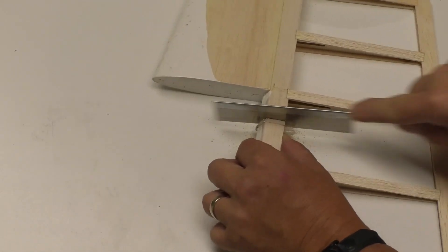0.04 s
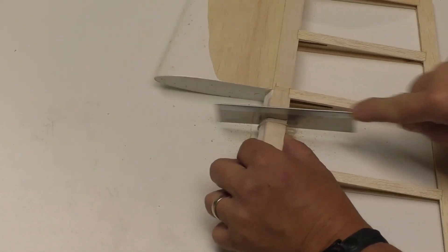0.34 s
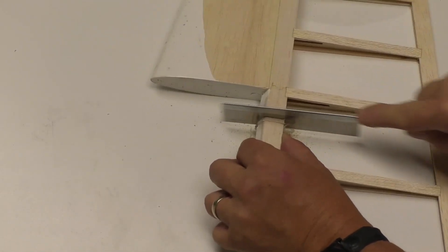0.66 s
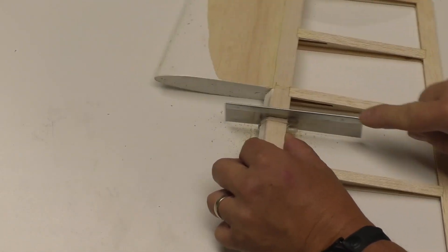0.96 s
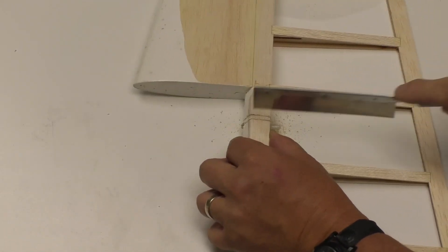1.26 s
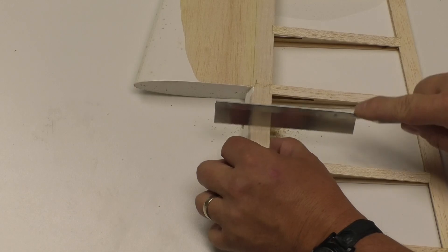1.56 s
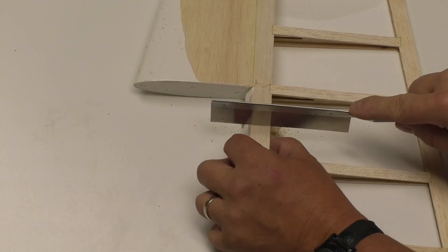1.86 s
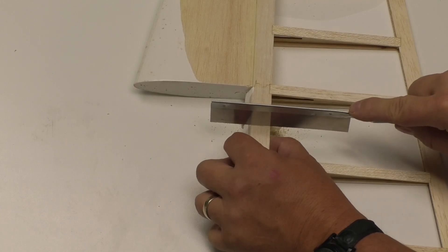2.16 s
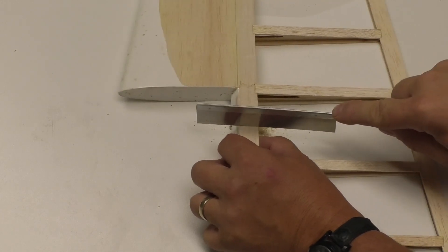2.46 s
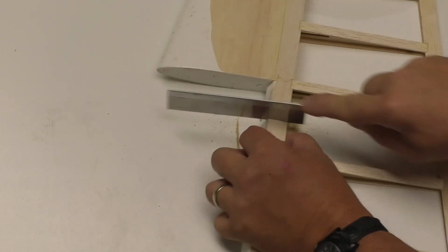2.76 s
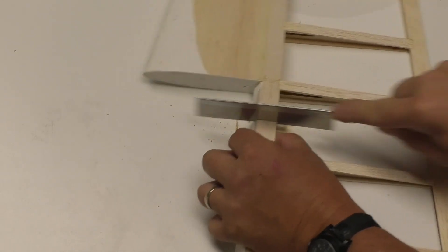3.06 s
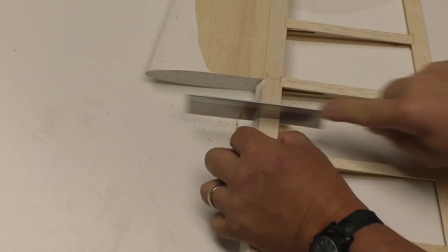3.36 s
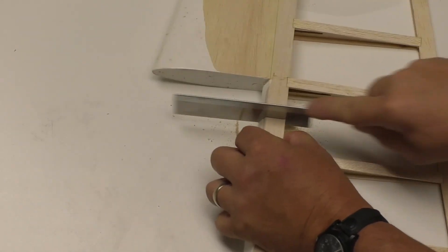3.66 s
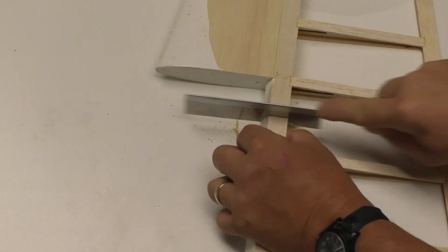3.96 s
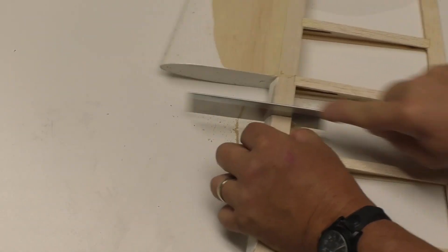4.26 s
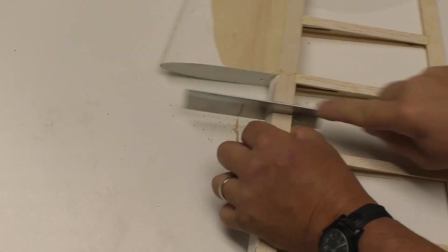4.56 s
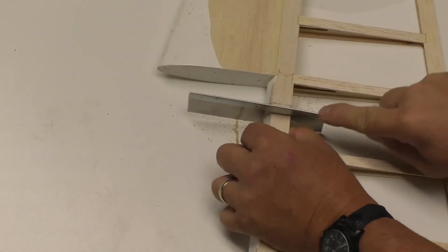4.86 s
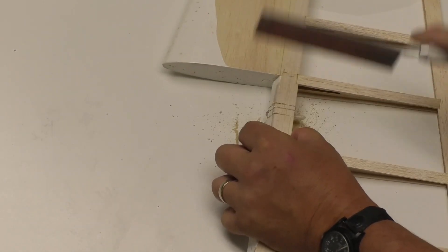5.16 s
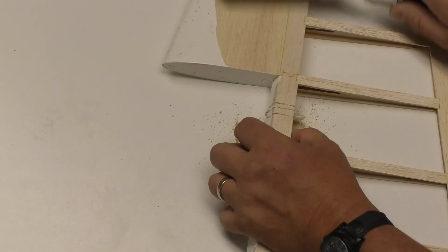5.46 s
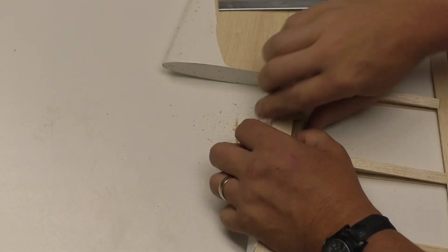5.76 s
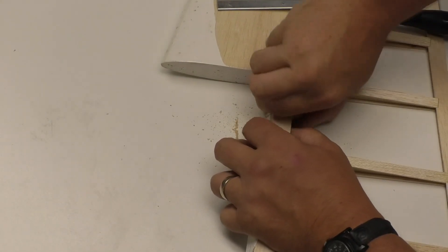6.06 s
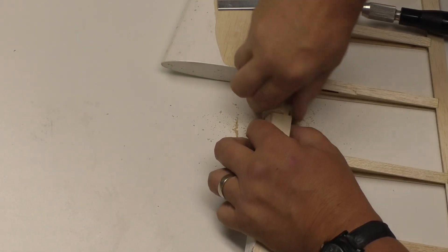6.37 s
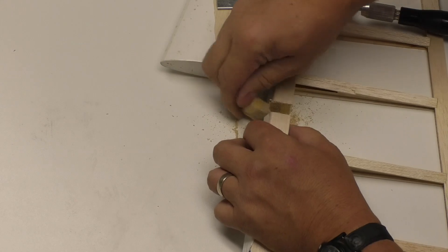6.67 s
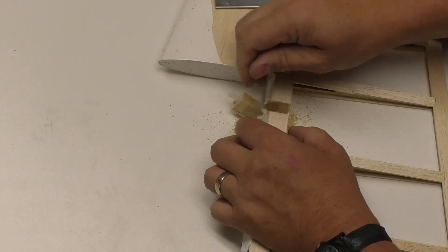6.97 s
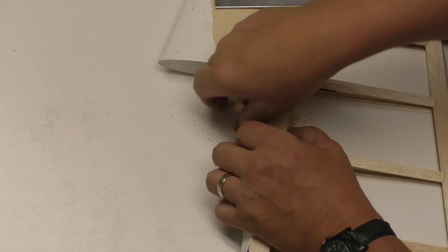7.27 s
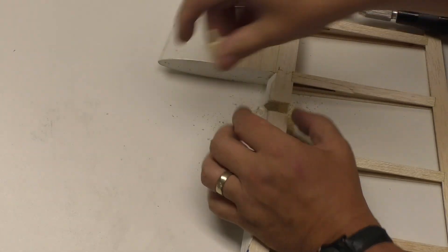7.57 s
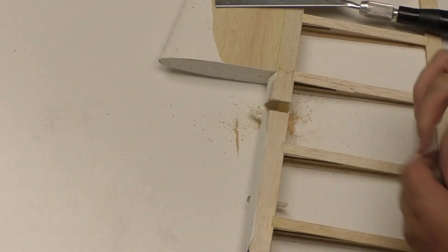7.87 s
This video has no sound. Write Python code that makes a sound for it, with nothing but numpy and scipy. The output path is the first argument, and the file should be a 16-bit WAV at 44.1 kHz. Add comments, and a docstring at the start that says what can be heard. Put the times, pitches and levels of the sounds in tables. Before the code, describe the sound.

In a small, slightly echoing workshop, a hand saw works rapidly back and forth through light wood, its fine teeth buzzing and hissing close by. After a short lull with soft knocks, a longer, brighter run of strokes follows. A loud clack marks the saw being set down. Then come a small crack, scattered ticks and soft finger scuffs as the piece is broken free, over quiet room air.

```python
"""A fine-toothed hand saw cuts a balsa spar of a model wing on a workbench, in a small, live room.
First run of quick strokes: teeth buzz at a rate set by blade speed, fibres rasp, the kerf hisses.
Pause: light knocks, a faint squeak. From 2.7 s a second run, crisp on the fresh edge until the blade
sinks in. At 5.5 s the saw is put down with a sharp clack; fingers then snap out the cut block
and pick at splinters. Room air and a faint hum throughout."""
import sys
import numpy as np
from scipy import signal
from scipy.fft import rfft, irfft
from scipy.io import wavfile
from scipy.ndimage import uniform_filter1d

SR = 44100
rng = np.random.default_rng(int(sys.argv[2]) if len(sys.argv) > 2 else 0)


def materialize(psi):
    """Save the field psi as 16-bit PCM at rate SR to the path in sys.argv[1].

    A 1-D psi becomes a single channel; in a 2-D psi each row is a channel.
    """
    bounded = np.clip(np.atleast_2d(psi).T, -1, 1)
    quanta = np.round(bounded * 32767).astype(np.int16)
    wavfile.write(sys.argv[1], SR, quanta)


N = 353593

# cutting and return strokes: (start [s], length [s], top tooth rate [Hz], bite [dB], rasp [dB])
PUSH_STROKES = [(-0.065, 0.128, 400.0, -31, -46.5), (0.209, 0.078, 710.0, -21.5, -28),
                (0.477, 0.146, 750.0, -27.0, -34), (0.793, 0.11, 560.0, -27.5, -34),
                (1.025, 0.115, 350.0, -49.5, -51.5), (2.369, 0.186, 600.0, -51, -50.5),
                (2.746, 0.097, 1000.0, -28, -26.5), (3.062, 0.126, 800.0, -27.5, -29.5),
                (3.361, 0.059, 840.0, -19, -26), (3.648, 0.09, 880.0, -22.5, -26),
                (3.958, 0.071, 930.0, -19.0, -26), (4.259, 0.108, 900.0, -23.5, -29.5),
                (4.555, 0.101, 830.0, -22.5, -29), (4.841, 0.087, 480.0, -25, -35),
                (5.06, 0.13, 750.0, -60.0, -38.5)]
PULL_STROKES = [(0.049, 0.084, 570.0, -28.5, -32), (0.311, 0.152, 550.0, -38.5, -39.0),
                (0.649, 0.083, 580.0, -32.5, -37), (0.915, 0.117, 520.0, -37.5, -39.5),
                (1.189, 0.136, 850.0, -44.5, -41), (2.53, 0.126, 600.0, -50, -50.0),
                (2.9, 0.1, 1020.0, -29, -27), (3.217, 0.1, 740.0, -31, -30.5),
                (3.495, 0.098, 720.0, -32, -31.5), (3.795, 0.101, 810.0, -29, -27),
                (4.09, 0.106, 850.0, -32, -31), (4.388, 0.12, 720.0, -34.5, -33),
                (4.681, 0.114, 780.0, -34, -35), (4.907, 0.187, 340.0, -44, -49)]
# resonances: (centre [Hz], width [Hz], gain [dB])
FRAME_MODES = [(324.3, 38, -3), (394, 43, -5), (536.4, 50, 0), (717, 94, -10), (807, 89, -5.5),
               (996, 97, -11.5)]  # wooden wing frame
KERF_MODES = [(1173, 320, -4), (1490, 203, 1.5), (1788, 196, -0.5), (2086, 220, -2), (2510, 620, -6),
              (3110, 405, -7), (3504, 260, -7.5), (4170, 180, -13), (4430, 260, -18), (5560, 780, -22.5)]  # blade and kerf
FREE_BLADE_MODES = [(2500, 90, -12), (3530, 89, -1)]
SWISH_MODES = [(2300, 1300, 1.5), (3670, 370, 5), (4770, 1400, -5.5)]  # skin across the grain
# resting blade in the kerf: (centre time [s], width [s, sign unused], pitch [Hz], level [dB])
KERF_SQUEAK = (2.5, -0.4, 1180, -69)
# impacts: (time [s], level [dB], treble gain [dB], decay [s])
WING_KNOCKS = [(1.448, -58.5, 20, 0.0051), (1.661, -43.5, 1, 0.006), (1.905, -54, 2, 0.016),
               (5.488, -21.5, 6.5, 0.0024), (5.5482, -1, 1.5, .0013), (5.603, -12, -21, 0.0014),
               (5.6097, -8, -25, 0.0014), (6.386, -38.5, -14, 0.0028), (6.916, -39.5, -25, 0.0068)]  # saw and hand on the wing; the last, dull one is the cut block dropping on the bench
FIBRE_SNAPS = [(.885, -40, 12.5, .002), (1.281, -28, -4, 0.0058), (2.911, -33.5, 14.5, 0.0039),
               (4.874, -37, 6, 0.0037), (5.133, -29.5, 3, 0.0024), (6.134, -28.5, 15, 0.0013),
               (6.147, -17, 1, 0.0035), (6.153, -17.5, -5, 0.0024), (6.304, -35, -7, 0.0026),
               (6.741, -34, -10, .003), (6.84, -19.5, -6, .002), (7.403, -22.5, -14, 0.0021),
               (7.411, -26.5, -14.5, .002), (7.683, -37, -6, .0027), (7.724, -38.5, -13, 0.0013),
               (7.943, -50.5, 11.5, .0017)]
# fingers and idle blade on wood: (start [s], length [s], level [dB], swish re level [dB])
RUB_STROKES = [(2.16, 0.51, -66, 1), (2.698, 0.096, -49, -17), (5.842, .11, -54, -11),
               (5.988, 0.096, -48, -7), (6.437, 0.12, -49, 6.5), (6.489, 0.26, -53.5, -2.5),
               (6.74, 0.17, -56.5, 1), (6.85, 0.29, -52.5, -7), (7.077, 0.32, -53, -12),
               (7.309, 0.092, -55, -3), (7.637, 0.078, -57.5, 0), (7.8, 0.38, -64.5, -18)]
# spectral shapes: (frequency [Hz], relative density [dB])
HISS_SPECTRUM = [(1500, -8), (3500, 9.5), (5500, 9.5), (6600, -1), (8000, -1), (10000, -2), (12500, -0.5),
                 (15500, -12)]
KNOCK_SPECTRUM = [(60, -31), (170, -18.5), (400, -7), (800, 4), (1150, 0.5), (1500, 1), (2000, 0),
                  (2700, -10.5), (3900, -6), (5400, -16), (7500, -24.5), (11000, -35.5), (16000, -44)]
SNAP_SPECTRUM = [(60, -25), (200, -15.5), (450, -10), (600, -4), (950, -9), (1500, 2.5), (2400, -7),
                 (3700, -0.5), (5500, -3), (7500, -13.5), (11000, -10), (16000, -22)]
RUB_SPECTRUM = [(150, -26), (400, -2), (900, -2.5), (1450, 5), (2200, -8.5), (4200, -4.5), (7000, -19),
                (12000, -15.5), (16000, -28)]
AIR_SPECTRUM = [(15, -45), (25, -22.5), (37, -20.5), (70, -12.5), (120, -9.5), (189, -4), (316, -4),
                (486, -11.5), (729, -12.5), (857, -15), (1780, -18.5), (1930, -18), (2390, -19.5),
                (13800, -25.5), (15800, -23.5)]
# room reverberation: (frequency [Hz], T60 [s], level re direct [dB])
ROOM_DECAY = [(150, .45, 6.5), (488, 0.21, 0), (1530, 0.3, -2.5), (3860, 0.27, -5.5), (8000, 0.12, -5.5),
              (15000, .18, -10)]
# workshop hum: (frequency [Hz], rms level [dB])
HUM_TONES = [(119, -74.5), (298, -73), (331, -73.5)]


def saw(jitter=0.03, flutter_db=3, gating=0.6, firm_bite_db=-30, fast_hz=480,
        thrum_db=-6.5, rasp_db=-1, hiss_db=0.77, drag_db=-9, highpass_hz=285):
    """Each passing tooth tugs at the frame and tears a pinch of fibres."""
    tooth_hz, bite, octave, rasp, hiss = pushes() + pulls()
    phase = 2 * np.pi * np.cumsum(tooth_hz * (1 + jitter * drift(450))) / SR
    grip = rms_one(from_db(flutter_db * drift(200)))  # uneven teeth and grain
    tearing = rms_one(grip ** 0.93 * (1 + gating * np.cos(phase)))
    # only a firm, fast bite makes the teeth chatter in step
    in_step = np.tanh(bite / from_db(firm_bite_db)) ** 0.5 * np.minimum(tooth_hz / fast_hz, 1) ** 2
    frame_gain = 0.32 + mode_gain(tooth_hz, FRAME_MODES)
    buzz = bite * in_step * frame_gain * grip * np.sqrt(2) * np.sin(phase)
    # teeth set left and right: two contacts a cycle drive the blade
    flutter = rms_one(from_db(flutter_db / 2 * drift(300)))
    buzz += octave * mode_gain(2 * tooth_hz, KERF_MODES) * flutter * np.sin(2 * phase)
    thrum = from_db(thrum_db) * bite * resonate(tearing * grains(6000, 1.6), FRAME_MODES, wander_db=3)
    fibres = from_db(rasp_db) * rasp * resonate(tearing * grains(4200, 1.9), KERF_MODES, wander_db=2)
    drag = from_db(drag_db) * uniform_filter1d(hiss, size=SR // 6)  # sides rub as the arm turns round
    kerf_noise = colour(tearing * grains(9000, 2.1), HISS_SPECTRUM)
    kerf_hiss = from_db(hiss_db) * np.hypot(hiss, drag) * kerf_noise
    highpass = signal.butter(3, highpass_hz, "high", fs=SR, output="sos")  # light frame: little bass
    return signal.sosfilt(highpass, buzz + thrum + fibres) + kerf_hiss


def pushes():
    """Cutting strokes: the teeth catch early, in one short, hard bite."""
    return strokes(PUSH_STROKES, bite_at=0.32, shortness=2.33, fastest_at=0.46, glide=1.05,
                   hiss_db=-47, fresh_hiss_db=9, octave_db=-3.5, fresh_octave_db=-2.5, slide_s=0.012)


def pulls():
    """Return strokes: the teeth skate, peak late and squeal on the fresh edge."""
    return strokes(PULL_STROKES, bite_at=0.64, shortness=0.71, fastest_at=0.66, glide=1.3,
                   hiss_db=-47.5, fresh_hiss_db=16.5, octave_db=-2.5, fresh_octave_db=11.5,
                   slide_s=0.0037)


def strokes(table, bite_at, shortness, fastest_at, glide, hiss_db, fresh_hiss_db, octave_db,
            fresh_octave_db, slide_s, fresh_cut_s=2.74, sink_in_s=0.28,
            hiss_db_per_db=0.45, usual_rasp_db=-29.5):
    """Arm speed and pressure arch once a stroke, setting tooth rate and four envelopes."""
    t = np.arange(N) / SR
    tooth_hz, bite, octave, rasp, hiss = np.zeros((5, N))
    for start_s, length_s, top_hz, bite_db, rasp_db in table:
        now = slice(*np.searchsorted(t, [start_s - slide_s, start_s + length_s]))
        along = (t[now] - start_s) / length_s
        fresh = np.exp((fresh_cut_s - start_s) / sink_in_s) * (start_s > fresh_cut_s)
        speed = arch(along, fastest_at)
        pressure = arch(along, bite_at) ** shortness
        tooth_hz[now] += top_hz * speed ** glide
        bite[now] += from_db(bite_db) * pressure
        rasp[now] += from_db(rasp_db) * np.sqrt(pressure) * speed
        octave[now] += from_db(rasp_db + octave_db + fresh_octave_db * fresh) * pressure * speed ** 2
        # the blade slides and hisses before the teeth catch
        sliding = arch((t[now] - start_s + slide_s) / (length_s + slide_s), 0.52)
        slide_db = hiss_db + hiss_db_per_db * (rasp_db - usual_rasp_db) + fresh_hiss_db * fresh
        hiss[now] += from_db(slide_db) * sliding
    return np.array([tooth_hz, bite, octave, rasp, hiss])


def blade_ring(ring_db=-12, squeak_width_hz=20):
    """Friction rings the thin steel on return strokes and makes it squeak faintly at rest."""
    _, _, _, rasp, _ = pulls()
    centre_s, width_s, hz, db = KERF_SQUEAK
    swell = np.exp(-((np.arange(N) / SR - centre_s) / width_s) ** 2)
    squeak = from_db(db) * swell * resonate(rng.standard_normal(N), [(hz, squeak_width_hz, 0)])
    return from_db(ring_db) * rasp * resonate(rng.standard_normal(N), FREE_BLADE_MODES) + squeak


def impacts(table, spectrum, treble_hz, rattle_db, rattle_s, gain_db=-4, size=4096):
    """Knock or snap: a fast-dying cluster of tiny contacts, then a faint rattle."""
    out = np.zeros(N + size)
    age_s = np.arange(size) / SR
    contacts = rng.choice([-1., 1.], (len(table), size))
    rattle = from_db(rattle_db) * np.exp(-age_s / rattle_s)
    for (time_s, db, treble_db, decay_s), contact in zip(table, contacts):
        burst = from_db(db) * contact * (np.exp(-age_s / decay_s) + rattle)
        treble = burst - signal.lfilter(*signal.butter(1, treble_hz, fs=SR), burst)
        onset = round(time_s * SR)
        out[onset:onset + size] += burst + (from_db(treble_db) - 1) * treble
    return from_db(gain_db) * colour(out[:N], spectrum)


def rubbing(gain_db=-5, uneven_db=2, firmest_at=0.16):
    """Skin and steel drag across the grain; each rub grips quickly and eases off."""
    t = np.arange(N) / SR
    scuff, swish = np.zeros((2, N))
    for start_s, length_s, db, swish_db in RUB_STROKES:
        now = slice(*np.searchsorted(t, [start_s, start_s + length_s]))
        touch = from_db(db) * arch((t[now] - start_s) / length_s, firmest_at)
        scuff[now] += touch
        swish[now] += from_db(swish_db) * touch
    scuff *= colour(grains(9000, 2.9), RUB_SPECTRUM)
    swish *= resonate(rng.standard_normal(N), SWISH_MODES)
    return from_db(gain_db + uneven_db * drift(70)) * (scuff + swish)


def room(x, gap_s=0.0035, bands=9):
    """Direct sound plus a diffuse tail that dies sooner in the treble."""
    age_s = np.arange(SR * 2 // 3) / SR
    white = rng.standard_normal((2, len(age_s)))
    edges_hz = np.geomspace(60, 18000, bands + 1)
    tail = 0
    for k, (low, high) in enumerate(zip(edges_hz, edges_hz[1:])):
        hz = np.sqrt(low * high)
        band = signal.sosfilt(signal.butter(2, [low, high], "band", fs=SR, output="sos"), white[k % 2])
        band *= from_db(-60 * age_s / at_hz(ROOM_DECAY, hz)) * (age_s > gap_s)
        gain = np.sqrt(2 * (high - low) / SR) * from_db(at_hz(ROOM_DECAY, hz, column=2))
        tail += gain * band / np.linalg.norm(band)
    return x + signal.oaconvolve(x, tail)[:N]


def background(air_db=-62.5, waver_db=1.5):
    """Room air and a faint, wavering hum."""
    t = np.arange(N) / SR
    hum = 0
    for hz, db in HUM_TONES:
        amplitude = np.sqrt(2) * from_db(db + waver_db * drift(6))
        hum += amplitude * np.sin(2 * np.pi * hz * t + drift(1.9))
    return hum + from_db(air_db) * colour(rng.standard_normal(N), AIR_SPECTRUM)


def grains(per_s, spread_db):
    """Fibres giving way: random clicks of uneven size; rms 1."""
    clicks = (rng.random(N) < per_s / SR) * rng.choice([-1, 1], N)
    return rms_one(clicks * from_db(spread_db * np.minimum(rng.exponential(1, N), 5)))


def resonate(x, modes, wander_db=0):
    """Parallel resonances of alternating sign; gains may wander as the contact moves; rms 1."""
    out = 0
    for k, (hz, width_hz, db) in enumerate(modes):
        radius = np.exp(-np.pi * width_hz / SR)
        forward = np.array([1, 0, -1]) * (1 - radius ** 2) / 2
        feedback = [1, -2 * radius * np.cos(2 * np.pi * hz / SR), radius ** 2]
        drive = x * from_db(db + wander_db * drift(18))
        out += (-1) ** k * signal.lfilter(forward, feedback, drive)
    return rms_one(out)


def mode_gain(hz, modes):
    """Gain of a resonant body driven at hz."""
    return sum(from_db(db) / (1 + ((hz - centre) / width * 2) ** 2) for centre, width, db in modes)


def colour(x, spectrum, size=4096):
    """Minimum-phase filter; white noise keeps its power."""
    cepstrum = irfft(np.log(from_db(at_hz(spectrum, np.fft.rfftfreq(size, 1 / SR)))))
    cepstrum[1:size // 2] *= 2
    cepstrum[size // 2 + 1:] = 0
    response = irfft(np.exp(rfft(cepstrum)))
    return signal.oaconvolve(x, response / np.linalg.norm(response))[:N]


def arch(along, peak_at):
    """Sine arch over 0-1 with its top at peak_at."""
    return np.sin(np.pi / 2 * np.interp(along, [0, peak_at, 1], [0, 1, 2]))


def drift(per_s):
    """Random curve, spread about 1."""
    knots = rng.standard_normal(N // 10)
    return np.interp(np.arange(N) / SR * per_s, np.arange(len(knots)), knots)


def at_hz(table, hz, column=1):
    """Interpolate a column over log frequency."""
    table = np.array(table)
    return np.interp(np.log(np.maximum(hz, 1)), np.log(table[:, 0]), table[:, column])


def rms_one(x):
    """Scale to rms 1."""
    return x / np.sqrt(np.mean(x ** 2) + 1e-20)


def from_db(db):
    """Decibels to gain."""
    return 10 ** (np.asarray(db) / 20)


def scene(extra_direct_db=-6):
    """Bench sounds in the room, mono; the knocks carry more direct sound."""
    knocks = impacts(WING_KNOCKS, KNOCK_SPECTRUM, treble_hz=3500, rattle_db=-25.5, rattle_s=0.02)
    snaps = impacts(FIBRE_SNAPS, SNAP_SPECTRUM, treble_hz=7000, rattle_db=-22.5, rattle_s=0.016)
    bench = saw() + blade_ring() + knocks + snaps + rubbing()
    return (room(bench) + from_db(extra_direct_db) * knocks + background())[None]


def record(dry, cutoff_hz=15950):
    """Clip at full scale, then a steep low-pass."""
    lowpass = signal.ellip(10, 0.1, 80, cutoff_hz, fs=SR, output="sos")
    return signal.sosfilt(lowpass, np.clip(dry, -1, 1))


dry = scene()
out = record(dry)
materialize(out)
```